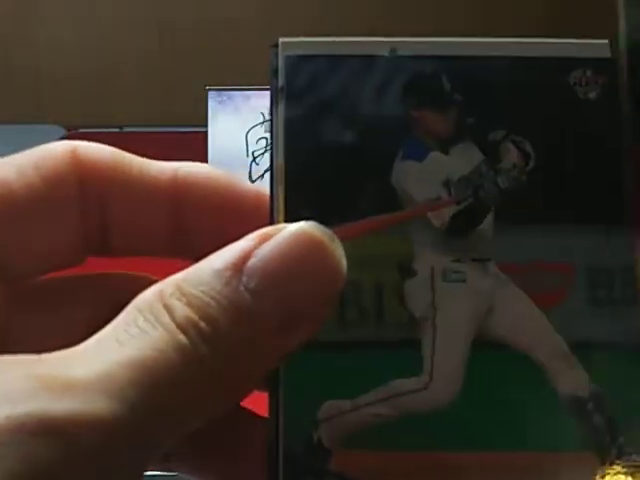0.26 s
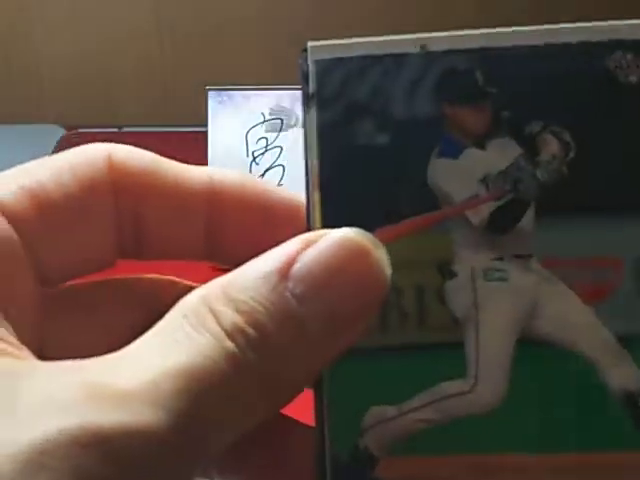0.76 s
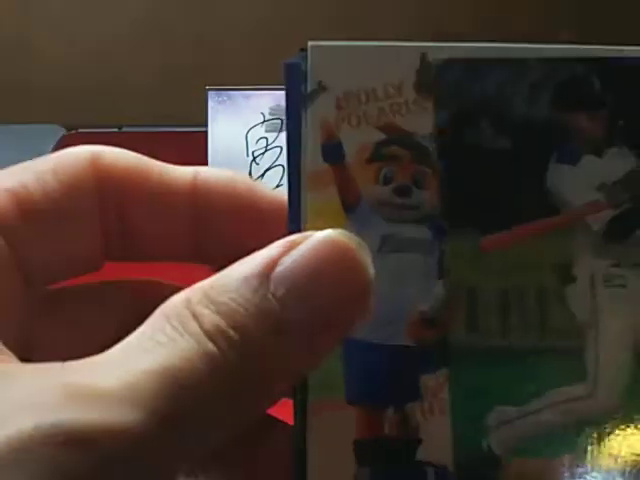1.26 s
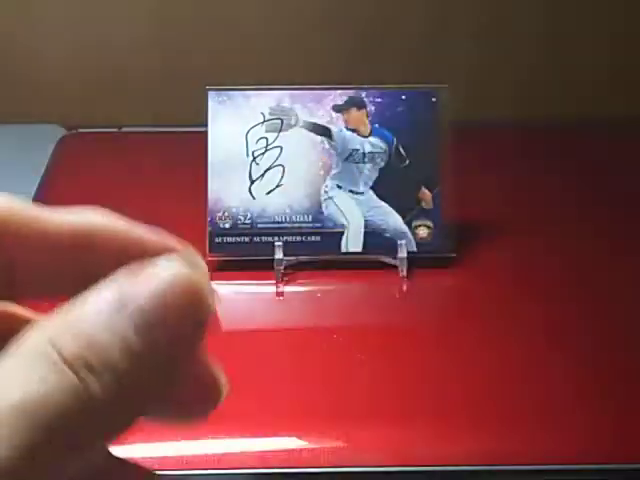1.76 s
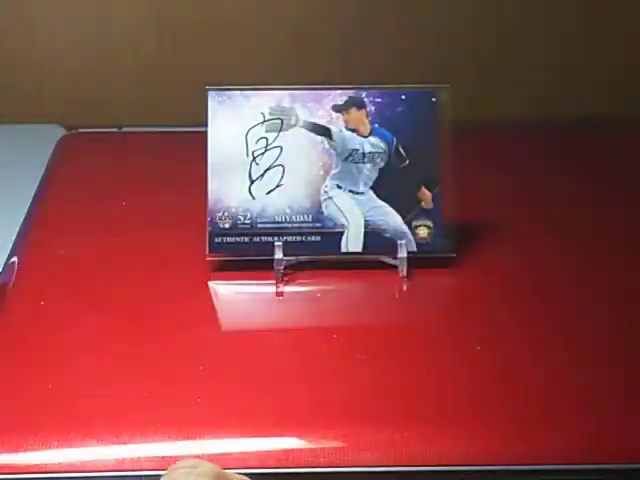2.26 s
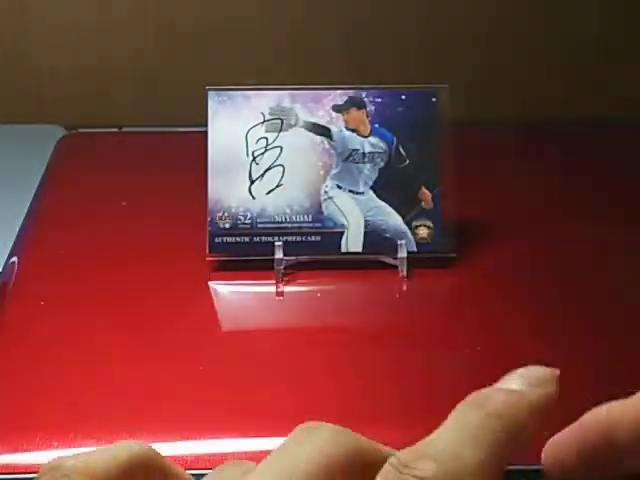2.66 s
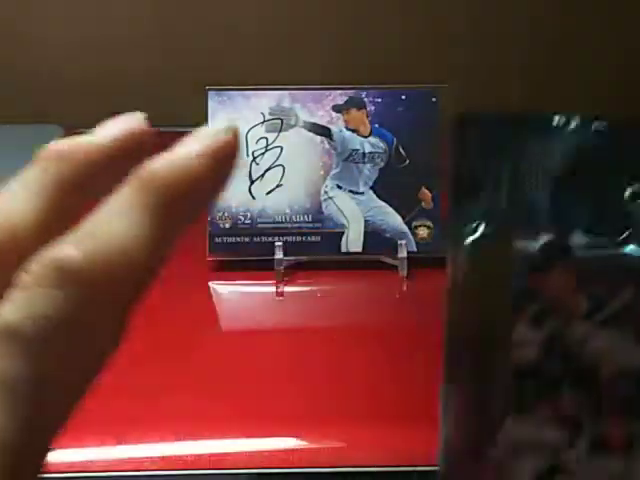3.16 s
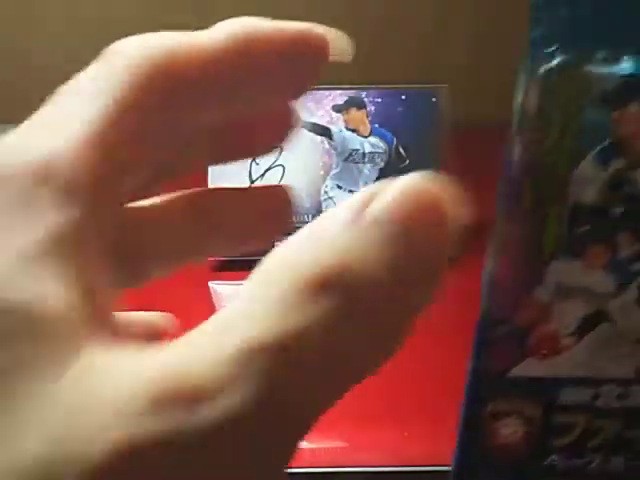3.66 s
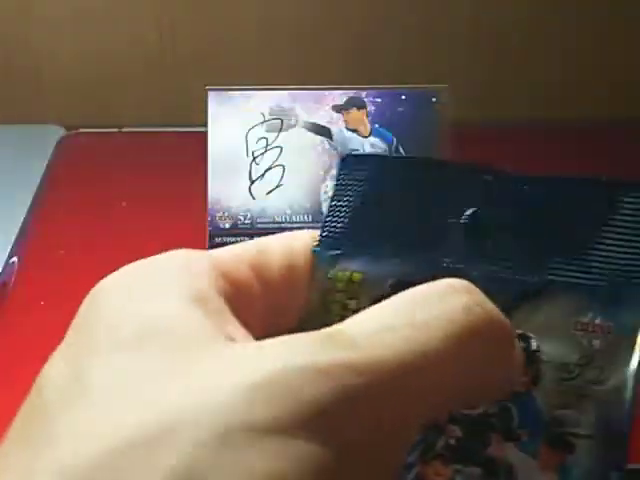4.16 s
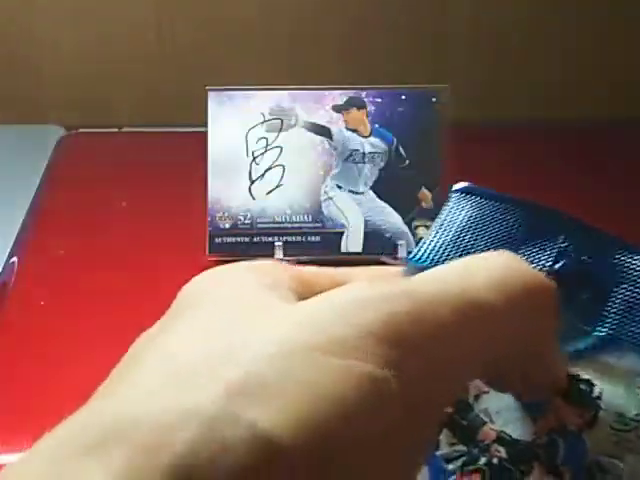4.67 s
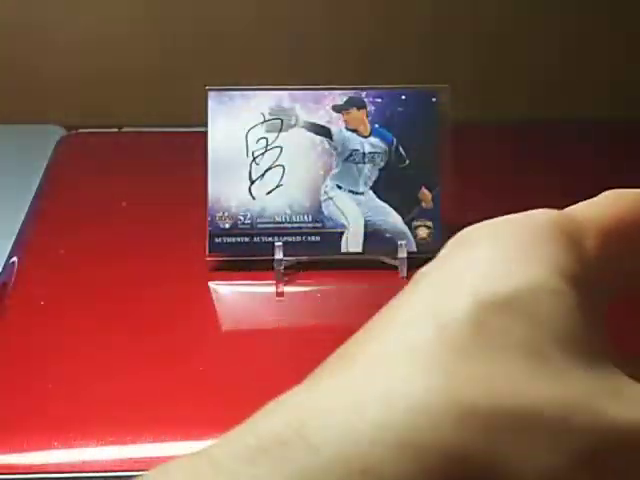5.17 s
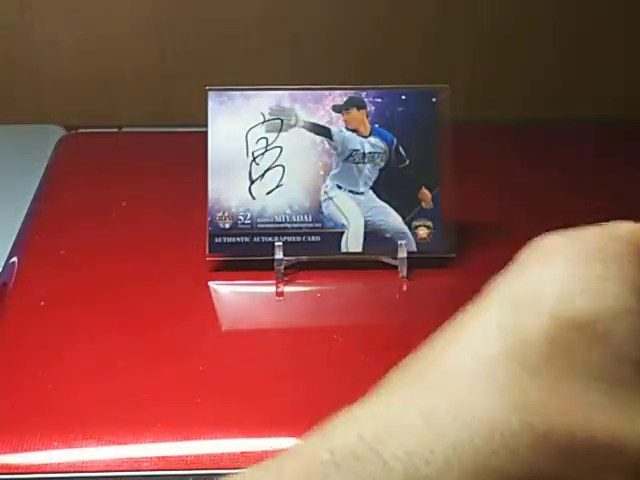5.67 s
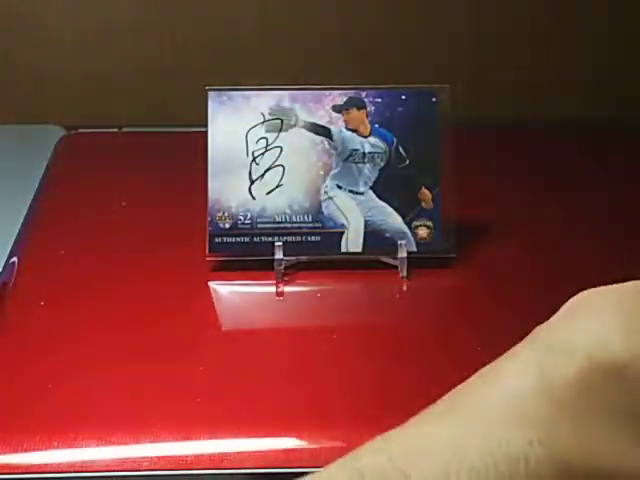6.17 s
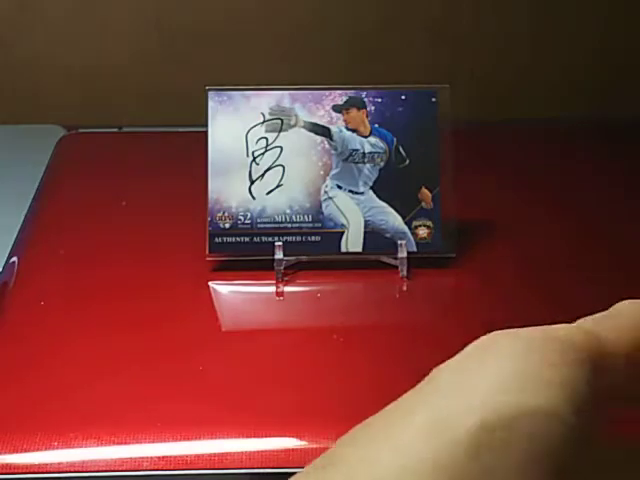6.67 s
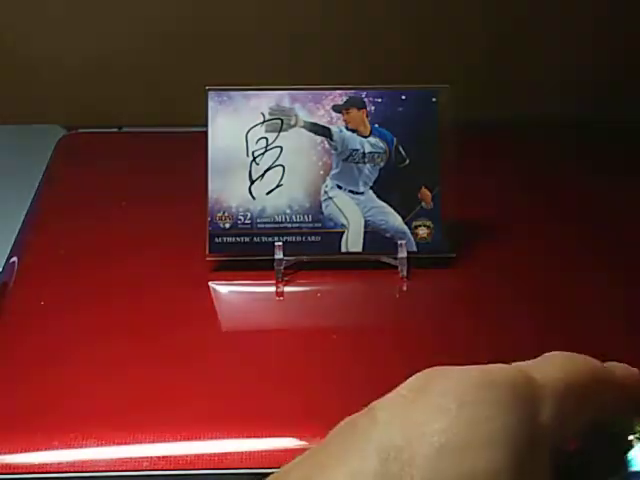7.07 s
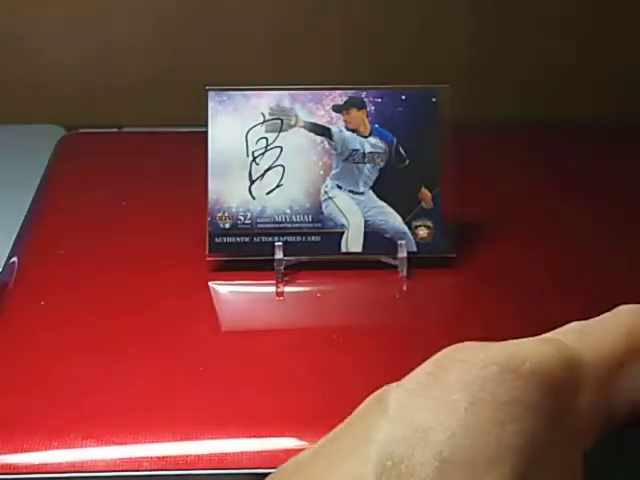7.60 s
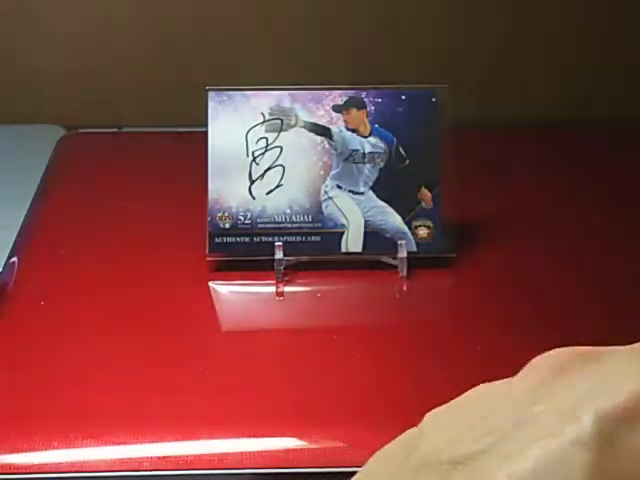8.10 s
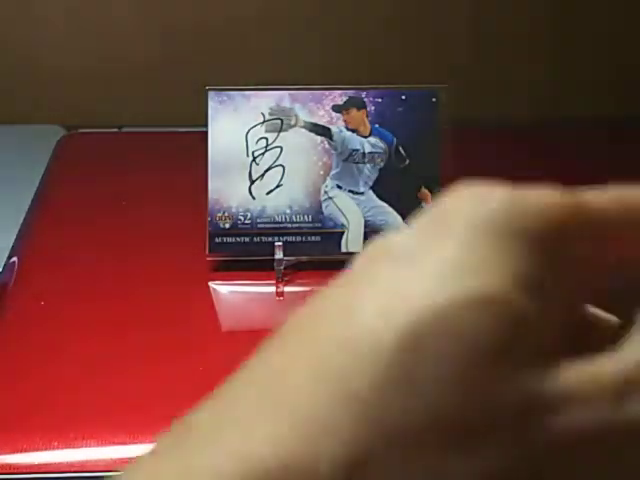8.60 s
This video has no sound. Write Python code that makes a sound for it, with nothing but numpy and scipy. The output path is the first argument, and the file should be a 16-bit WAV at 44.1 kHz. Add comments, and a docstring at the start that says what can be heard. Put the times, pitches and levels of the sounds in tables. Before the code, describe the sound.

Soft card ticks in a quiet room, then a foil packet is gripped, crinkled and torn with bright, dry, irregular crackles close up.

```python
"""At a desk in a small room, close to a phone, hands square paper cards, then crumple and tear a foil pack.
Cards tick and foil creases snap as short noise bursts; fine crackle is clumpy noise shaped by hand strokes.
All of these pass through the foil's tone colour. Knuckles knock the desk, heard as short decaying tones.
Fading noise gives the room's echo; a distant appliance hums in wavering tones over the microphones' hiss."""
import sys
import numpy as np
from scipy import signal
from scipy.fft import rfft, irfft, next_fast_len
from scipy.io import wavfile
from scipy.ndimage import uniform_filter1d, map_coordinates

SR = 44100
rng = np.random.default_rng(int(sys.argv[2]) if len(sys.argv) > 2 else 0)


def unload_wav(signal):
    """Save mono or channel-first audio to the path in sys.argv[1] as 16-bit WAV at rate SR, clipped to [-1, 1]."""
    wavfile.write(
        sys.argv[1],
        SR,
        np.round(np.clip(np.atleast_2d(signal).T, -1, 1) * 32767).astype(np.int16),
    )


def elevation(decibels):
    """Turn decibel levels (scalar or array-like) into linear amplitude ratios."""
    levels = np.asarray(decibels, float)
    return 10 ** (levels / 20)


N = 389868

# Room rumble and microphone hiss: (frequency [Hz], relative level [dB per Hz])
HISS_SPECTRUM = [(15, -66.5), (30, -31.5), (60, -6), (150, -17), (400, -23.5), (750, -29), (2000, -31.5),
                 (4000, -32), (7000, -38.5), (8800, -49.5), (10200, -67.5), (13000, -109)]
# How alike rumble and hiss are at left and right: (frequency [Hz], likeness [1 = same])
HISS_LIKENESS = [(100, 0.96), (300, 0.71), (1000, 0.11)]
# Tones of the distant appliance: (frequency [Hz], middle peak level [dB])
HUM_TONES = [(59, -69), (92, -71), (119, -59), (360, -70.5), (528, -67.5)]
# Faint steady rubbing while the pack is held: (start [s], end [s], level [dB])
HOLDING = (1.7, 11, -66)
# The foil lets go at once and settles: (time [s], length [s], level at start [dB])
SLIP_STROKES = [(.03, 0.15, -49.5), (2.433, 0.096, -43), (2.81, 0.033, -25), (2.943, 0.16, -34.5),
                (4.4, 0.07, -35), (4.468, 0.034, -44), (4.636, 0.068, -25), (4.836, 0.02, -46),
                (4.891, 0.16, -45), (5.699, 0.087, -33), (5.747, 0.046, -34.5), (6.948, 0.084, -24),
                (7.032, 0.027, -36.5), (5.856, 0.046, -32.5), (7.578, .05, -40.5), (7.672, .07, -34),
                (8.3, 0.15, -32), (8.568, 0.076, -39)]
# Fingers pull ever harder until a crease gives: (time [s], length [s], level at end [dB])
PULL_STROKES = [(1.89, 0.19, -61.5), (2.211, 0.14, -53), (3.171, 0.233, -54), (4.211, .09, -49),
                (5.493, 0.079, -39), (5.819, 0.057, -30), (6.123, .075, -35.5), (6.348, 0.12, -36),
                (6.806, 0.16, -55), (7.388, .08, -30.5), (8.072, 0.13, -37.5), (8.23, 0.082, -40.5)]
# Even rubbing: (time [s], length [s], level [dB])
RUB_STROKES = [(2.591, 0.16, -53.5), (5.17, 0.19, -52), (6.006, 0.079, -39), (7.632, 0.041, -20),
               (7.836, 0.095, -37)]
# Foil colour as the microphones hear it: (frequency [Hz], relative level [dB per Hz])
FOIL_COLOUR = [(180, -25), (320, -19), (647, -15.5), (1440, -10.5), (1820, -7.5), (2450, -5), (3300, -4.5),
               (3850, -0.5), (4300, -6.5), (4820, -18.5), (9240, -26.5), (10200, -35.5), (13300, -48.5),
               (22000, -120)]
# The two microphone ports ring differently: (frequency [Hz], left over right [dB])
PORT_BALANCE = [(600, -1.5), (1800, 0.5), (3500, -17), (5600, -3.5), (9500, 22)]
# How long the room rings: (frequency [Hz], time to fall by 60 dB [s])
ROOM_DECAY = [(300, .3), (2000, 0.19), (9000, 0.17)]
# Card ticks and buckling creases:
# (time [s], level [dB], body over level [dB], sparkle over level [dB], time to halve [ms])
CREASE_SNAPS = [(0.325, -40, 2.5, -38, 4.5), (0.7246, -38.5, 1, -12, 2.4), (0.741, -39.5, -2, -18, 2.7),
                (2.0532, -24.5, -8, -16, 2.45), (2.2385, -25.5, -11.5, -13, 0.79),
                (2.2646, -29.5, -12, -10.5, 1), (2.3937, -31.5, -8, -17, 2.1),
                (2.4183, -9.0, -19, -17, 0.83), (2.43, -11, -21, -9.5, 1.6),
                (2.445, -22.5, -11, -15.5, 0.6), (2.5197, -19.5, -11, -13.0, 1.9),
                (2.6639, -27.5, -10, -8.0, 1.5), (2.7287, -30.5, 5, -6.5, 1.1),
                (2.7867, -32.0, -9.5, -2, 1.7), (2.8024, -22.5, 8.5, -16.5, 2.2),
                (2.8281, -24.5, 2.5, -16, 1.6), (2.942, -32.5, -15, -41.5, 0.7),
                (2.9519, -13, 3.5, -19.5, 1), (2.9862, -17.5, -8, -3.5, 1.6), (2.9943, -13, -10, -9.5, 1.4),
                (3.0344, -20.5, -6.5, -6, 0.9), (3.2078, -25, -17, -0.5, 1.3),
                (3.2573, -29.5, -12, -7, 2.8), (3.3487, -25, -12, -1.5, 1.2),
                (3.5445, -22.5, 4.5, -2.5, 0.93), (3.795, -36.5, -17, -37, 0.97),
                (3.9184, -19.5, -3.5, -8.5, 1.43), (3.9654, -23.5, -3.5, -7, 1.2),
                (4.0167, -14.5, -11, -11.5, 0.62), (4.078, -29.5, -8.5, -22, 1.2),
                (4.288, -21.5, -6, -8, 1.55), (4.5829, -28.5, -15.5, -4.5, 0.98),
                (4.63, -19, 1.5, -23, 4.9), (4.8989, -16.5, -7, -13, 1.45), (5.064, -32.5, 0, -11.5, 1.2),
                (5.5604, -16.5, -4, -28, 0.78), (5.5711, -11.5, -21, -23.5, 0.37),
                (5.5762, -14.5, -2, -12.5, 1.5), (5.7535, -28, -13, 4, 4.3),
                (5.8217, -20.5, -11, -23.5, 0.8), (5.8326, -20, -5, -29, 1.7),
                (5.8412, -11.5, -3.5, -11.5, 1.3), (5.857, -28, -11.5, -10, 1.0),
                (6.1077, -40.5, 5, -2, 1.2), (6.1523, -23, -13, -10, 0.63), (6.171, -20.5, 1.5, -12.5, 3.7),
                (6.2374, -23.5, -6.5, -4, 1.3), (6.29, -30.5, 3, -16, 4.2), (6.3615, -35, -1, -25, 0.67),
                (6.3757, -23.5, -4.5, -14, 1.4), (6.4275, -16.5, -5, -22, 1.2),
                (6.4415, -15.5, -7, -2, 0.88), (6.455, -18, -19.5, -3.5, 1.4),
                (6.5396, -21, -6.5, -13.5, 0.29), (6.712, -10, -15.5, -5.5, 0.5),
                (6.9004, -21.5, 3, -16.5, 3.6), (6.9503, -28.5, -11, -26.5, 0.84),
                (6.9594, -23.5, 1, -15, 10.2), (7.037, -28, -7.5, -14.5, 4),
                (7.1999, -21.5, -11.5, -5, 1.64), (7.4073, -22.5, -7.5, -25, 1.4),
                (7.4177, -19.5, -7, -8, 3.2), (7.432, -17, -8.5, -10.5, 1.6), (7.4563, -18, -6, -9, 2.2),
                (7.577, -27, -12, -6.5, 3.4), (7.6199, -9.5, -18, -10.5, 1.3), (7.643, -6, -15.5, -19, 3.5),
                (7.6597, -12, -26.5, -13, 5), (7.6715, -20, -19.5, -25.5, 2),
                (7.842, -18.5, -9.0, -25.5, 1.7), (7.8613, -13.5, -14, -19, 0.86),
                (7.8711, -9, -14.5, -16.5, 0.91), (7.8838, -3.5, -6.5, -18, 2),
                (7.9082, -6.5, -4.5, -12, 2.8), (7.9171, -17, -15.5, -35.5, 0.8),
                (7.9419, -18.5, -8, -12, 2.9), (8.1365, -15, -4, -31, 3.3), (8.1671, -13, -9, -13.5, 0.58),
                (8.2109, -12, -10, -15.5, 0.3), (8.2934, -19.5, -8.0, -12, 2.5)]
# Knuckles on the desk: (time [s], level [dB], time to damp by 20 dB, at least 0.01 [s], spot along desk [0-1])
DESK_KNOCKS = [(4.403, -31, 0.015, 0.28), (4.431, -29.5, 0.0088, 0.52), (4.478, -36, 0.032, 0.27),
               (4.629, -36, 0.042, .25), (6.899, -19, 0.035, .25), (6.957, -24.5, 0.038, 0.41),
               (7.031, -32.5, 0.028, 0.25), (7.881, -35, 0.05, 0.03)]
# Ways the desk top vibrates, in order: (frequency [Hz], typical level [dB])
DESK_MODES = [(125, -13), (232, -5.5), (315, -5), (470, -2), (715, -16)]

HISS_DB = -60  # average of the shared and opposed parts, before they are added
WAVER_PER_S = 12  # random points a second in the hum's wavering
START_S, STOP_S = 0.0099, 0.065  # time for a stroke to set in, to die
SETTLE_DB, SWELL_DB = 21.5, 6  # fall over a slip, rise over a pull
HOLD_BODY_DB, SLIP_BODY_DB, PULL_BODY_DB, RUB_BODY_DB = -8, -6.5, -7, -5  # low body over ring
CLUMP_DB, SPIKE_DB = 3, 4  # unevenness of the crackle
BODY_HZ, SPARKLE_HZ = 3000, 6000  # body lies below the first, sparkle above the second
CREASE_COLOUR_DB = 4  # scatter of a snap's spectrum
CLICK_DB = 10.5  # the instant of buckling over the noise around it
ECHO_DB = -12
BAND_LIMIT_HZ = 10090


def unit(x):
    """Scales a signal to an average (rms) level of 1."""
    return x / np.sqrt(np.mean(x ** 2) + 1e-20)


def along(points, hz):
    """Reads a (frequency, value) table on a logarithmic frequency axis."""
    f, v = np.transpose(points)
    return np.interp(np.log(hz + 1), np.log(f + 1), v)


def wobble(rate):
    """Joins random points, rate of them a second, into a smooth curve."""
    points = rng.standard_normal(int(N * rate / SR) + 4)
    return map_coordinates(points, [np.arange(N) * rate / SR])


def filtered(x, response):
    """Makes each frequency louder or softer as the response says."""
    size = next_fast_len(N + SR // 2)
    spectrum = rfft(x, size) * response(np.fft.rfftfreq(size, 1 / SR))
    return irfft(spectrum, size)[..., :N]


def causal(gain):
    """Builds a filter with this gain that starts at once, by folding its cepstrum."""
    size = 2 * gain.shape[-1] - 2
    cepstrum = irfft(np.log(gain + 1e-6), size)
    cepstrum[..., 1:size // 2] *= 2
    cepstrum[..., size // 2 + 1:] = 0
    return irfft(np.exp(rfft(cepstrum)), size)[..., :size // 2]


def pair(noise, alike):
    """Mixes two noises into a left and right that share a part."""
    turn = np.arccos(np.clip(alike, 0, 1)) / 2
    shared = np.cos(turn) * noise[0]
    opposed = np.sin(turn) * noise[1]
    return np.array([shared + opposed, shared - opposed])


def patchy(noise, depth_db):
    """Raises and lowers noise in narrow streaks of time and pitch."""
    z = signal.stft(noise, nperseg=512)[2]
    across_pitch = uniform_filter1d(rng.standard_normal(z.shape), 2, -2)
    streaks = unit(uniform_filter1d(across_pitch, 4, -1))
    return unit(signal.istft(z * elevation(depth_db * streaks), nperseg=512)[1][..., :N])


def background():
    """Rumble is much alike at both ports, hiss hardly; a far motor adds unsteady tones."""
    def response(hz):
        turn = np.arccos(np.clip(along(HISS_LIKENESS, hz), -1, 1)) / 2
        return elevation(along(HISS_SPECTRUM, hz)) * [np.cos(turn), np.sin(turn)]

    noise = patchy(rng.standard_normal((2, N)), depth_db=4)
    shared, opposed = elevation(HISS_DB) * unit(filtered(noise, response))
    cycles = 2 * np.pi * np.arange(N) / SR
    hum = np.zeros(N)
    for hz, db in HUM_TONES:
        loudness = elevation(db + 2.2 * wobble(WAVER_PER_S))
        hum += loudness * np.sin(hz * cycles + 1.9 * wobble(WAVER_PER_S))
    return np.array([shared + opposed, shared - opposed]) + hum


def strokes(rows, start_db, end_db):
    """Strokes set in quickly, run from start_db to end_db about their level, then die away."""
    t = np.arange(N) / SR
    total = np.zeros(N)
    for s, length, db in rows:
        times = s + np.array([-START_S, 0, length, length + STOP_S])
        total += elevation(np.interp(t, times, [-120, db + start_db, db + end_db, -120]))
    return total


def rustle():
    """Each stroke sets off countless tiny creases: noise in uneven clumps with short louder spikes."""
    t = np.arange(N) / SR
    start, end, held_db = HOLDING
    held = elevation(held_db) * np.interp(t, [start - .1, start, end, end + .1], [0, 1, 1, 0])
    slips = strokes(SLIP_STROKES, 0, -SETTLE_DB)
    pulls = strokes(PULL_STROKES, -SWELL_DB, 0)
    rubs = strokes(RUB_STROKES, 0, 0)
    ring = held + slips + pulls + rubs
    body = elevation(HOLD_BODY_DB) * held + elevation(SLIP_BODY_DB) * slips
    body += elevation(PULL_BODY_DB) * pulls + elevation(RUB_BODY_DB) * rubs
    sparkle = elevation(-14.5 + 1.3 * wobble(23)) * ring
    spikes = np.minimum(rng.exponential(size=N // 48 + 1), 3.5).repeat(48)[:N]
    grain = elevation(CLUMP_DB * wobble(90) + SPIKE_DB * spikes)
    # The hand's effort sets the energy of each moment.
    grain /= np.sqrt(np.abs(uniform_filter1d(grain ** 2, size=SR // 25)))
    crackle = grain * pair(patchy(rng.standard_normal((2, N)), depth_db=8), alike=0.91)
    return np.array([body, ring, sparkle])[:, None] * crackle


def foil_voice(drive):
    """Body, ring and sparkle (3 x 2 x N) take on the foil's colour at each port."""
    hz = np.fft.rfftfreq(2048, 1 / SR)
    low = 1 / (1 + (hz / BODY_HZ) ** 6)
    high = 1 / (1 + (SPARKLE_HZ / (hz + 1)) ** 10)
    bands = np.sqrt([low, (1 - low) * (1 - high), high]) * elevation(along(FOIL_COLOUR, hz))
    bands /= np.sqrt(np.mean(bands ** 2, axis=1, keepdims=True))
    right = 1 / (1 + elevation(2 * along(PORT_BALANCE, hz)))  # share of the power
    ports = np.sqrt(2 * np.array([1 - right, right]))
    filters = causal(bands[:, None] * ports)
    return signal.oaconvolve(drive, filters, axes=2)[..., :N].sum(axis=0)


def room(x):
    """Each pitch of the echo dies at its own speed; the tail is drawn anew every half second."""
    out, step = np.zeros((2, N + 2 * SR)), SR // 2
    for start in range(0, N, step):
        hz, t, z = signal.stft(rng.standard_normal((2, step)), SR, nperseg=256)
        fade = elevation(-60 * t / along(ROOM_DECAY, hz)[:, None])
        tail = signal.istft(z * fade, SR, nperseg=256)[1]
        wet = signal.fftconvolve(x[:, start:start + step], tail / np.linalg.norm(tail[0]), axes=1)
        out[:, start + 150:start + 150 + wet.shape[1]] += wet  # the echo starts 150 samples late
    return out[:, :N]


def snaps():
    """Each tick or crease is a short noise burst with a brief rise and a fast fall, in its own colour."""
    drive, half = np.zeros((3, 2, N + SR)), SR // 25
    ms = 1000 * np.arange(-half, half) / SR
    ring = unit(elevation(along(FOIL_COLOUR, np.fft.rfftfreq(2 * half, 1 / SR))))
    for s, db, body_db, sparkle_db, fall_ms in CREASE_SNAPS:
        fall = max(fall_ms, .2)
        lumps = elevation(2 * rng.standard_normal(2 * half // 32 + 1).repeat(32)[:2 * half])
        # Long snaps still rise fast.
        shape = elevation(np.where(ms < 0, 9 * ms / np.sqrt(fall), -6 * ms / fall))
        scatter = unit(uniform_filter1d(rng.standard_normal(half + 1), size=60))
        colour = elevation(CREASE_COLOUR_DB * scatter)
        noise = unit(irfft(rfft(rng.standard_normal((2, 2 * half))) * colour))
        burst = shape * lumps * pair(noise, alike=0.94)
        burst[:, half] += elevation(CLICK_DB)
        # The crease spends a set energy.
        heard = irfft(rfft(burst) * ring)
        left, right = burst * np.sqrt(np.mean(shape ** 2) / np.mean(heard ** 2))
        lag = round(rng.normal(2, 4))  # samples between the ports
        gains = elevation(db + np.array([body_db, 0, sparkle_db]))
        place = slice(round(s * SR) - half, round(s * SR) + half)
        drive[..., place] += gains[:, None, None] * [np.roll(left, lag), right]
    return drive[..., :N]


def knocks():
    """Modes ring more the farther the blow is from their still lines, until the resting hand damps them."""
    out, t = np.zeros(N + SR), np.arange(SR // 4) / SR
    for s, db, length, spot in DESK_KNOCKS:
        ring = np.zeros(len(t))
        for number, (hz, level) in enumerate(DESK_MODES, start=1):
            strength = elevation(level + rng.standard_normal()) * np.sin(np.pi * number * spot)
            ring += strength * np.sin(2 * np.pi * hz * t)
        damping = elevation(db - 20 * (t / max(length, .01)) ** 4)
        onset = 1 - np.exp(-t / 0.0046)
        out[round(s * SR):][:len(t)] += damping * onset * ring
    return out[:N]


def scene():
    """Adds the nearby foil, cards and desk, their echo, and the background."""
    foil = foil_voice(snaps() + rustle())
    desk = np.array([knocks()] * 2)
    return foil + desk + room(elevation(ECHO_DB) * (foil + desk)) + background()


def roll_off(x):
    """The treble ends steeply here."""
    return signal.sosfilt(signal.butter(12, 10400, fs=SR, output="sos"), x)


def record(dry):
    """The input clips softly towards 0.8 of full scale and keeps little above its band limit."""
    clipped = dry / (1 + np.abs(dry / .8) ** 6) ** (1 / 6)
    limited = filtered(clipped, lambda hz: 0.048 + 1 / (1 + (hz / BAND_LIMIT_HZ) ** 40))
    return roll_off(limited)


dry = scene()
out = record(dry)
unload_wav(out)
```